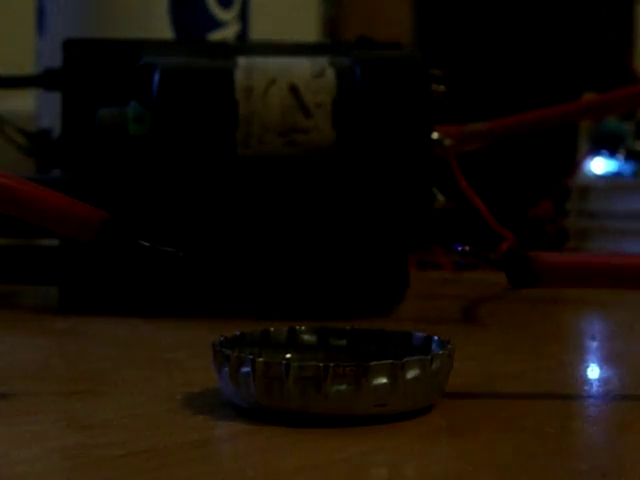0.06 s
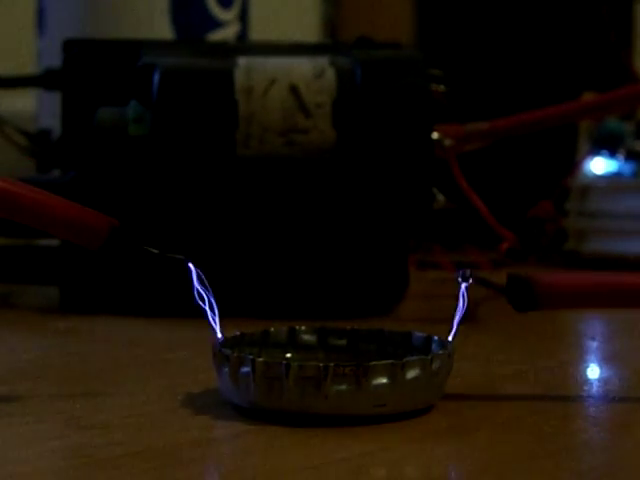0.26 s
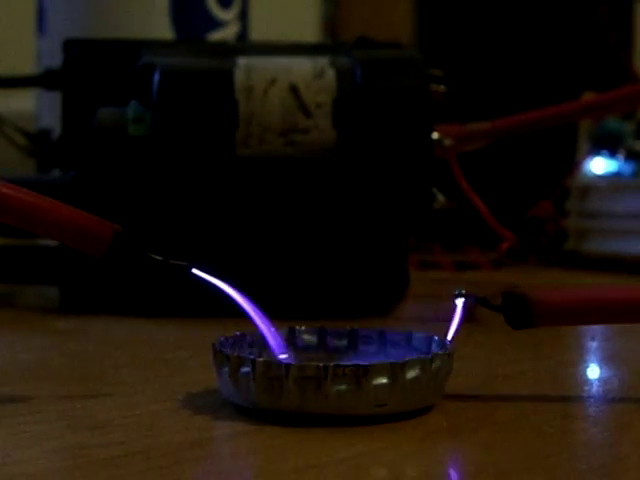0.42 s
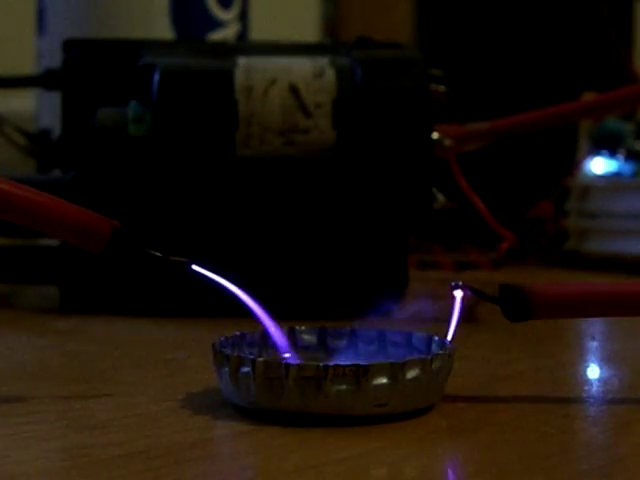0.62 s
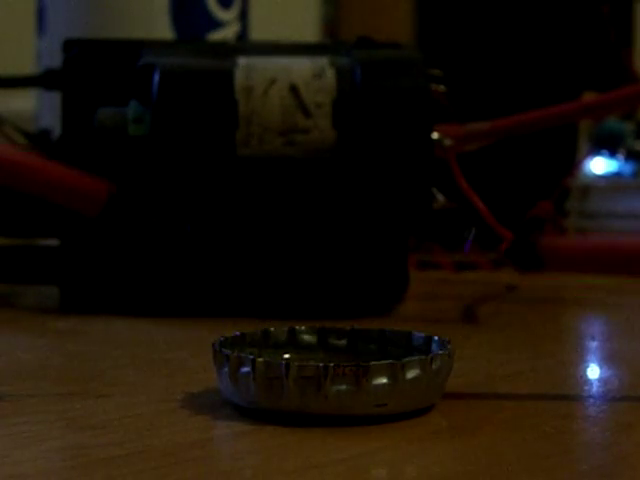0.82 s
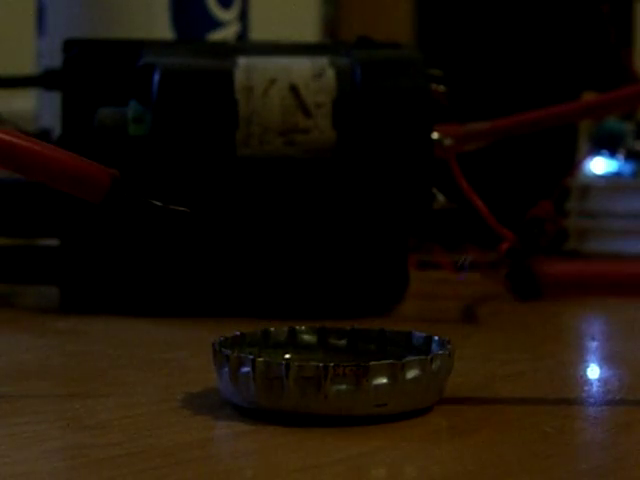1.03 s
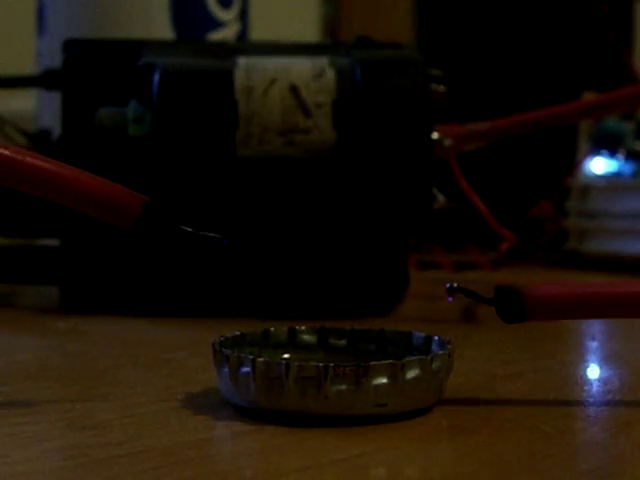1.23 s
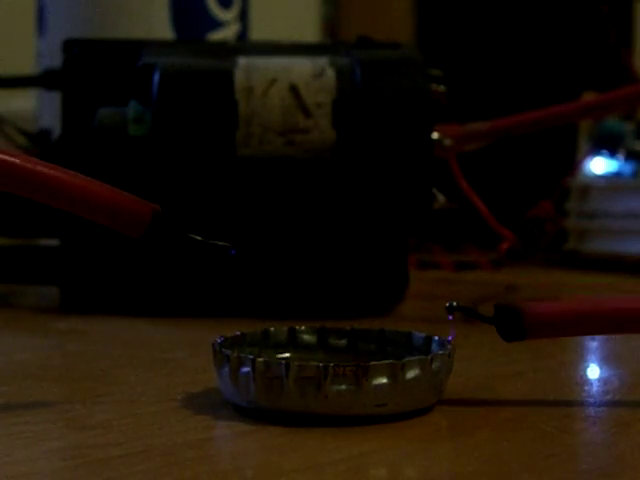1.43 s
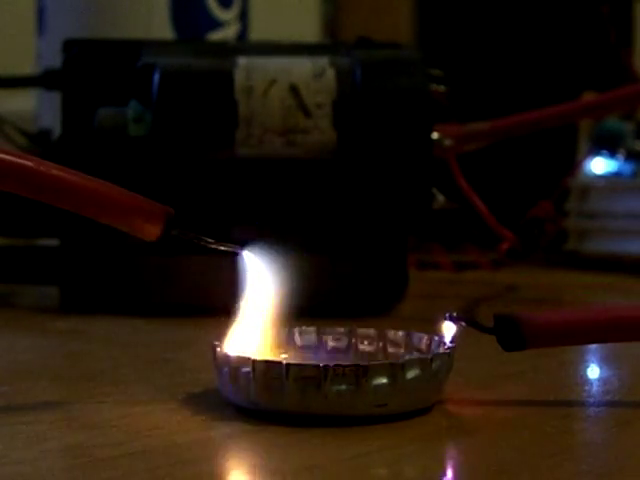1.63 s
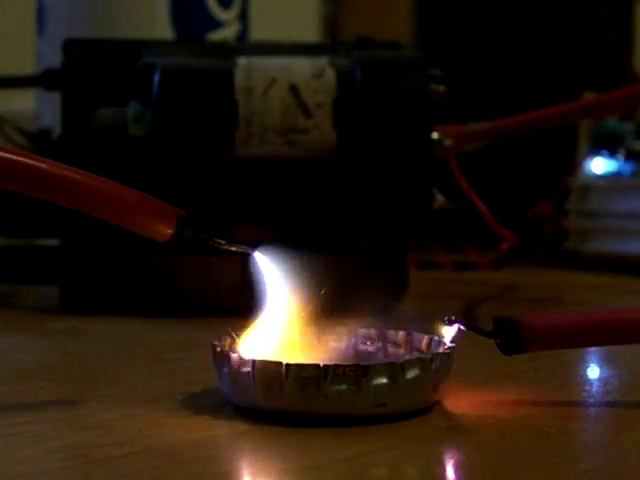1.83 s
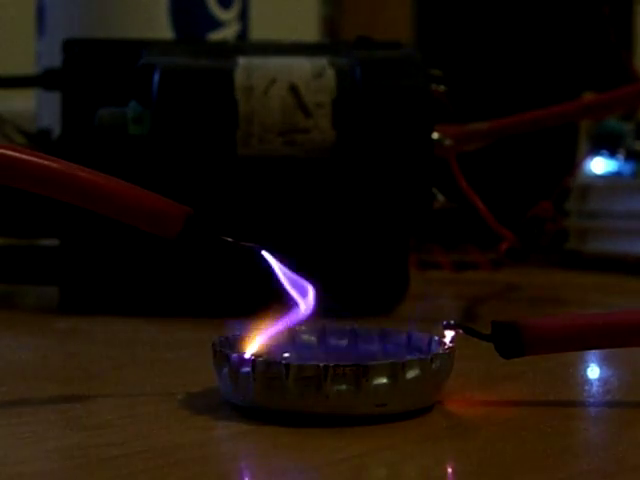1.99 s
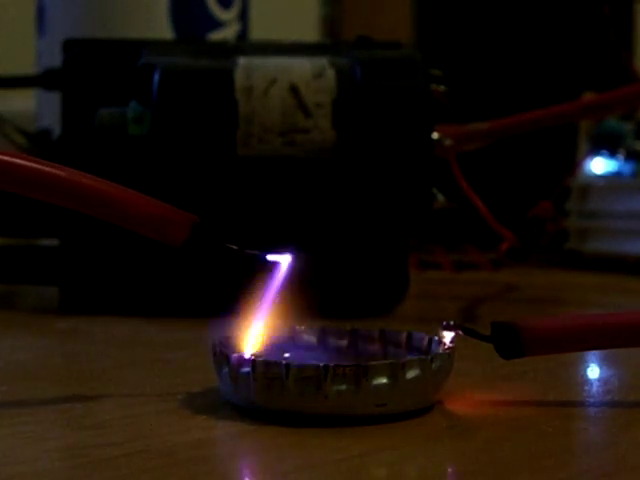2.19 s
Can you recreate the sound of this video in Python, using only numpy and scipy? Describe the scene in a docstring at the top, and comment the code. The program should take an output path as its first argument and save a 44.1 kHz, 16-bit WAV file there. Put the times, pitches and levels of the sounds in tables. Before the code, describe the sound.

An electric arc crackles onto a metal bottle cap in a quiet room and steadies into a loud, very high whine. It cuts out, sparks again in a sharp volley, then burns with a softer hiss and sizzle.

```python
"""High voltage jumps from two metal probes to a bottle cap on a table in a quiet room.
Corona ticks build up as charge leaks from the tips, and from 0.2 s sparks snap over.
The arc stutters, holds from 0.4 s with a piercing whine at the supply's switching rate,
and breaks at 0.75 s. The ticks return, a second volley of sparks follows at 1.3 s, and from
1.5 s a hot, flame-like arc burns with a broad hiss, then sizzles as it scorches the cap."""
import sys
import numpy as np
from scipy import signal
from scipy.fft import rfft, irfft
from scipy.io import wavfile
from scipy.ndimage import uniform_filter1d

SR = 44100
rng = np.random.default_rng(int(sys.argv[2]) if len(sys.argv) > 2 else 0)


def store_wav(level_fs):
    """Save 16-bit WAV to argv[1]."""
    pcm = np.round(np.clip(np.atleast_2d(level_fs), -1, 1) * 32767)
    wavfile.write(sys.argv[1], SR, pcm.T.astype(np.int16))


N = 103635
T = np.arange(N) / SR


def amp(db):
    return 10 ** (np.asarray(db) / 20)


def unit_rms(x):
    return x / np.sqrt(np.mean(x ** 2) + 1e-20)


def at_hz(points, hz):
    """A curve's value at hz, on a log frequency axis."""
    points_hz, value = np.transpose(points)
    return np.interp(np.log(hz + 1), np.log(points_hz + 1), value)


def gain_curve(points):
    """Gain along a dB curve, silent outside it."""
    time_s, db = np.transpose(points)
    return np.interp(T, time_s, amp(db), left=0, right=0)


def add(mix, start_s, sound):
    part = mix[round(start_s * SR):][:len(sound)]
    part += sound[:len(part)]


def tint(x, colour, top_hz=17250):
    """Colours a long sound, at rms 1."""
    hz = np.fft.rfftfreq(len(x), 1 / SR)
    return unit_rms(irfft(rfft(x) * amp(at_hz(colour, hz)) * (hz < top_hz), len(x)))


def noise(colour, size=N):
    return tint(rng.standard_normal(size), colour)


def click(colour, size=512):
    """A causal click with the given spectrum and energy 1."""
    log_gain = np.log(amp(at_hz(colour, abs(np.fft.fftfreq(size, 1 / SR)))))
    impulse = np.fft.ifft(np.exp(np.conj(signal.hilbert(log_gain)))).real
    return impulse / np.linalg.norm(impulse)


def burst(envelope, impulse):
    """Brief noise, evened out over frequency, then coloured by the impulse."""
    x = rng.standard_normal(len(envelope)) * envelope
    for _ in range(4):
        spectrum = rfft(x)
        x = irfft(spectrum / (abs(spectrum) + 1e-12), len(x))
        x = x * envelope / np.sqrt(abs(uniform_filter1d(x ** 2, size=16)) + 1e-12)
    return np.convolve(x, impulse)[:len(x)]


def tick(colour, decay_s=.001, size=512):
    """One tiny discharge."""
    return burst(np.exp(-np.arange(size) / SR / decay_s), click(colour))


def crackle(per_s, spread_db, bed, decay_s=.001):
    """Random micro-discharges, each a short puff of noise, over a steady bed."""
    hits = (rng.random(N) < per_s / SR) * amp(spread_db * np.minimum(rng.exponential(1, N), 2.5))
    power = signal.lfilter([1], [1, -np.exp(-2 / (decay_s * SR))], hits ** 2)
    return rng.standard_normal(N) * np.sqrt(power / power.mean() + bed ** 2)


# Room noise spectrum. Each row: frequency in Hz, relative level in dB.
FLOOR_COLOUR = [(12, -31.5), (20, 3.5), (89, -19.5), (227, -2), (261, -9), (292, -13.5), (472, -8.5),
                (644, -12), (854, -14), (1230, -15.5), (17000, -21.5)]
# Hum tones. Each row: frequency in Hz, rms level in dB.
HUM_TONES = [(234, -71.5), (294, -69.5), (392, -78), (577, -78.5)]


def background(floor_db=-59.5):
    """Quiet room noise and a faint equipment hum."""
    hum = sum(amp(db) * np.sqrt(2) * np.sin(2 * np.pi * (hz * T + rng.random())) for hz, db in HUM_TONES)
    return hum + amp(floor_db) * noise(FLOOR_COLOUR)


# Reverberation time. Each row: frequency in Hz, seconds to fall 60 dB.
TAIL_T60_S = [(200, 0.62), (2000, 0.27), (3600, 0.26), (8000, 0.33), (11000, 0.23), (17000, 0.24)]
# Reverberation spectrum. Each row: frequency in Hz, relative level in dB.
TAIL_COLOUR = [(40, -14.5), (1500, 0.5), (3700, 9), (4750, 0), (5600, -3.5), (7000, -3.5), (9300, -5),
               (12000, -6), (17000, -8.5)]


def room(x, rise_s=.004):
    """Diffuse reflections whose treble dies before the bass."""
    hz, t, spectra = signal.stft(noise(TAIL_COLOUR, SR), SR, nperseg=256)
    decay = amp(-60 * t / at_hz(TAIL_T60_S, hz)[:, None])
    tail = signal.istft(spectra * decay, SR, nperseg=256)[1]
    tail *= np.minimum(np.arange(len(tail)) / SR / rise_s, 1)
    return signal.fftconvolve(x, tail / np.linalg.norm(tail))[:N]


# Corona level curve, louder ticks and duller pops. Each row: time in seconds, level in dB.
CORONA_DB = [(0, -49), (.06, -55.5), (.10, -54), (.165, -47), (.2, -51), (.225, -42.5), (.30, -47),
             (.75, -62.5), (.98, -80), (1.06, -58), (1.09, -54.5), (1.2, -50), (1.24, -51), (1.28, -44.5),
             (1.40, -44), (1.44, -44), (1.48, -41.5), (1.51, -74)]
LOUD_TICKS = [(.1605, -42.5), (.1641, -42.5), (.1671, -41.5), (.188, -41), (.2149, -38), (.9945, -50),
              (1.0717, -41), (1.0835, -40), (1.0874, -40), (1.0903, -35.5), (1.12, -41), (1.122, -31.5),
              (1.1271, -28.5), (1.1434, -32), (1.1586, -37), (1.1647, -33), (1.1775, -33), (1.1923, -34),
              (1.1965, -36), (1.2057, -29), (1.2198, -35), (1.2548, -32), (1.2701, -31), (1.2825, -30),
              (1.298, -30)]
DULL_POPS = [(1.1212, -57), (1.1258, -48), (1.1415, -43), (1.2047, -42), (1.2195, -29)]
# Tick and pop spectra. Each row: frequency in Hz, relative level in dB.
TICK_COLOUR = [(40, -6.5), (1400, -9), (3300, -0.5), (3900, -9), (4750, 1), (5600, -9.5), (7200, 1.5),
               (9800, 2), (11050, -5), (12000, 1.5), (13300, -7.5), (14500, -0.5), (17000, -10.5)]
DULL_COLOUR = [(40, -13), (1000, -4), (2200, 2), (3400, 5), (4800, -14), (17000, -26)]


def corona():
    """Fine ticking of charge leaking from the probe tips."""
    out = gain_curve(CORONA_DB) * tint(crackle(per_s=400, spread_db=5.5, bed=.55), TICK_COLOUR)
    for start_s, db in LOUD_TICKS:
        add(out, start_s, amp(db) * tick(TICK_COLOUR))
    for start_s, db in DULL_POPS:
        add(out, start_s, amp(db) * tick(DULL_COLOUR))
    return out


# Hiss of the whining arc and the hot arc. Each row: time in seconds, level in dB.
WHINING_ARC_DB = [(.318, -56), (.332, -24), (.37, -30), (.40, -29.5), (.43, -31), (.48, -26), (.6, -26),
                  (.745, -27), (.765, -51)]
HOT_ARC_DB = [(1.478, -50), (1.488, -33), (1.51, -35), (1.543, -39.5), (1.575, -30.5), (1.62, -30.5),
              (1.66, -25.5), (1.68, -28.5), (1.705, -35.5), (1.76, -28.5), (1.80, -28), (1.835, -26),
              (1.865, -28.5), (1.89, -32.5), (1.95, -30), (2.11, -31.5), (2.15, -27), (2.2, -29.5),
              (2.26, -24.5), (2.35, -25)]
# Puffs of heated air. Each row: start in seconds, length in seconds, level in dB.
AIR_PUFFS = [(0.32, 0.077, -34), (1.477, 0.013, -33)]
# Hiss and puff spectra. Each row: frequency in Hz, relative level in dB.
WHINING_ARC_COLOUR = [(20, 4.5), (100, 2.5), (500, 2), (1200, 3), (2500, 3), (6000, 0), (12500, 4.5),
                      (17000, 2.5)]
HOT_ARC_COLOUR = [(20, 3.5), (100, -1), (300, 1), (1000, 0), (3000, 0.5), (6500, 1), (9500, 2), (12000, 0),
                  (17000, 0)]
AIR_COLOUR = [(20, -26), (120, 2), (400, -1.5), (900, -7), (2000, -27), (17000, -41)]


def hiss():
    """Burning plasma hisses almost evenly at all frequencies, with a puff as it lights."""
    out = gain_curve(WHINING_ARC_DB) * noise(WHINING_ARC_COLOUR)
    out += gain_curve(HOT_ARC_DB) * noise(HOT_ARC_COLOUR)
    air = noise(AIR_COLOUR)
    for start_s, length_s, db in AIR_PUFFS:
        out += amp(db) * air * np.sin(np.pi * np.clip((T - start_s) / length_s, 0, 1))
    return out


# Sizzle level curve. Each row: time in seconds, level in dB.
SIZZLE_DB = [(1.70, -62), (1.88, -57), (1.91, -30.5), (1.98, -41), (2.07, -28.5), (2.11, -34.5),
             (2.2, -35.5), (2.28, -38), (2.35, -52)]
# Sizzle spectrum. Each row: frequency in Hz, relative level in dB.
SCORCH_COLOUR = [(40, -39), (2500, -9.5), (4700, -8), (5800, -9.5), (8000, -6), (9400, 6), (10300, -9),
                 (11200, -3), (17000, -17)]


def sizzle():
    """Dense bright crackle where the hot arc scorches the cap."""
    return gain_curve(SIZZLE_DB) * tint(crackle(per_s=700, spread_db=4.5, bed=.6), SCORCH_COLOUR)


def swoop(length_s, whine_hz=10626.7, glide_s=.0005, edge_s=.0006):
    """Phase and envelope of the whine: it swoops up as the arc catches, down as it fails."""
    t = np.arange(0, length_s, 1 / SR)
    depth_hz = 2380 * min(1, length_s / (4 * glide_s)) ** 2
    hz = whine_hz - depth_hz * (np.exp(-t / glide_s) + np.exp((t - length_s) / glide_s))
    envelope = np.sqrt(2) * np.clip(np.minimum(t, length_s - t) / edge_s, 0, 1)
    return 2 * np.pi * np.cumsum(hz) / SR, envelope


# Brief catches and hot-arc spits. Each row: start in seconds, length in seconds, level in dB.
ARC_CATCHES = [(.3308, .0042, -12.5), (0.335, 0.0078, -12), (0.345, .0042, -13), (0.3506, 0.003, -14.5),
               (0.3582, 0.0048, -11.5), (0.3688, .0042, -13), (0.376, 0.0057, -12.5),
               (0.3836, 0.0031, -13.5), (1.417, 0.0055, -47), (1.433, 0.0056, -44), (1.44, .005, -42),
               (1.449, 0.0056, -42), (1.457, .004, -44), (1.46, .004, -48)]
ARC_SPITS = [(1.9, 0.0013, -25), (1.9105, .0014, -29), (1.996, .0014, -23), (2.0756, .0016, -26),
             (2.0778, .0016, -24), (2.0895, 0.00091, -13), (2.0906, 0.00083, -6.5), (2.0915, 0.002, -11.5),
             (2.267, 0.0017, -24), (2.271, .0016, -25), (2.289, .0015, -27)]


def stutter(crack_gain_db=-5.5):
    """The arc chirps as it catches and fails; each spit adds a crack."""
    out = np.zeros(N)
    for start_s, length_s, db in ARC_CATCHES + ARC_SPITS:
        phase, envelope = swoop(length_s)
        add(out, start_s, amp(db) * envelope * np.sin(phase))
    for start_s, length_s, db in ARC_SPITS:
        add(out, start_s, amp(db + crack_gain_db) * tick(SCORCH_COLOUR, decay_s=length_s))
    return out


# Overtones of the overloaded whine, folding down into the audible band.
# Each row: harmonic number, level in dB relative to the fundamental.
OVERTONES = list(zip((3, 4, 5, 7, 11, 3 * 5), (-21, -33.5, -26, -38, -41, -46)))


def whine(start_s=.3912, end_s=.7475, held_db=-8, swell_db=6, swell_s=.085):
    """The held arc sings at the supply's switching rate and swells as it lengthens."""
    phase, envelope = swoop(end_s - start_s)
    t, out = np.arange(len(phase)) / SR, np.zeros(N)
    swell = amp(-swell_db * np.maximum(1 - t / swell_s, 0))
    flutter = 1 + .015 * unit_rms(uniform_filter1d(rng.standard_normal(len(t)), size=300))
    tone = np.sin(phase) + sum(amp(db) * np.sin(harmonic * phase) for harmonic, db in OVERTONES)
    add(out, start_s, amp(held_db) * envelope * swell * flutter * tone)
    return out


# Sparks across the gaps. Each row: start in seconds, level in dB, ring frequency in Hz.
GAP_SPARKS = [(.2255, -5.5, 7770), (.2457, -9.5, 7770), (.2520, -10.5, 7600), (0.2547, -9.5, 7640),
              (.2595, -9.5, 7760), (0.3013, -9.5, 8080), (0.3053, -8.5, 9500), (.3070, -7, 10500),
              (0.3084, -8.5, 9250), (0.3193, -14, 8240), (0.3227, -10, 9200), (0.3236, -13.5, 9500),
              (0.3293, -14.5, 9200), (.3307, -8.5, 9200), (0.3345, -13, 8830), (0.336, -25.5, 9500),
              (0.344, -8.5, 9600), (.3520, -10, 9200), (0.3527, -20, 9300), (0.3551, -12.5, 10000),
              (.3587, -29.5, 9300), (0.359, -9.5, 7360), (0.3617, -12.5, 7000), (0.366, -16, 7800),
              (0.3684, -15.5, 7800), (0.3724, -8.5, 9300), (0.376, -17, 7400), (.3800, -22.5, 8700),
              (.3810, -11, 7640), (0.3861, -8, 8700), (.3891, -11.5, 7300), (.3912, -13.5, 8500),
              (0.7469, -7, 9320), (0.7484, -11, 7930), (0.7508, -8, 7410), (0.7554, -15.5, 7900),
              (0.7577, -10.5, 7720), (1.2884, -6, 9330), (1.3107, -9, 9760), (1.3193, -7.5, 9060),
              (1.326, -13, 9350), (1.3481, -8, 9080), (1.3530, -11, 9300), (1.3571, -8.5, 9150),
              (1.3635, -11.5, 9200), (1.3676, -9.5, 9400), (1.3755, -11.5, 9400), (1.4721, -7, 9510),
              (1.4760, -7, 9390), (1.4791, -11, 9730), (1.4825, -10.5, 9100), (1.484, -9, 7700),
              (1.4846, -9, 9400)]
# Sparks turn tonal as an arc nears holding. Each row: time in seconds, ring-to-noise gain in dB.
RING_DB = [(.26, -5), (.307, 4.5), (.322, 0), (.335, 10), (.39, 10.5), (.75, -4), (1.29, -5), (1.47, -5),
           (1.485, 3.5)]
# Snap spectra before and after the probes move. Each row: frequency in Hz, relative level in dB.
EARLY_SNAP_COLOUR = [(40, -18.5), (400, -18), (1300, -18), (2100, -5.5), (2800, -11), (3250, 0), (3900, -8),
                     (4750, 5.5), (5400, -9.5), (6100, -9), (7000, 1.5), (7900, 5.5), (8700, -2),
                     (10300, 3.5), (11000, -4), (11900, 8), (13350, -9.5), (14300, 3), (15400, -0.5),
                     (16600, -0.5), (17500, -13.5), (19500, -27)]
LATE_SNAP_COLOUR = [(40, -17.5), (400, -14), (900, -16), (1400, -11.5), (2300, -5), (2750, -6.5),
                    (3350, -0.5), (3850, -5.5), (4300, -8), (4750, 4.5), (5550, -9.5), (6400, -0.5),
                    (7200, -4), (7850, 5.5), (8350, -4), (8750, 5), (9400, 6.5), (10400, 0), (11050, -4),
                    (11600, 2), (12050, -4), (12650, 1.5), (13250, 2.5), (14300, -2.5), (15700, -10),
                    (16300, 6), (17500, -19), (19500, -41)]


def sparks(hold_s=.00105, decay_s=.0017, probes_moved_s=.5, drive=.56):
    """Each spark is a sharp crack, a saturated millisecond of ringing noise and a quick tail."""
    out, t = np.zeros(N), np.arange(512) / SR
    envelope = np.where(t < hold_s, 1, .34 * np.exp(-abs(t - hold_s) / decay_s))
    early, late = click(EARLY_SNAP_COLOUR), click(LATE_SNAP_COLOUR)
    for start_s, db, ring_hz in GAP_SPARKS:
        crack = early if start_s < probes_moved_s else late
        ring_gain = amp(np.interp(start_s, *np.transpose(RING_DB)))
        ring = ring_gain * envelope ** 2 * np.sin(2 * np.pi * (ring_hz * t + rng.random()))
        snap = (4.7 * crack + burst(envelope, crack) + ring) / np.sqrt(1 + ring_gain ** 2 / 2)
        add(out, start_s, amp(db) * np.tanh(drive * snap) / drive)
    return out


def scene(discharge_send_db=-20, whine_send_db=-28):
    """Mono mix; the discharges and the whine excite the room."""
    discharges = sparks() + stutter() + corona() + sizzle()
    tone = whine()
    room_send = amp(discharge_send_db) * discharges + amp(whine_send_db) * tone
    return (discharges + tone + hiss() + room(room_send) + background())[None]


def record(dry, cutoff_hz=19100):
    """Full-scale clipping, then a low-pass."""
    low_pass = signal.firwin(255, cutoff_hz, window=("kaiser", 9), fs=SR)
    return signal.oaconvolve(np.clip(dry, -1, 1), low_pass[None], "same")


dry = scene()
out = record(dry)
store_wav(out)
```